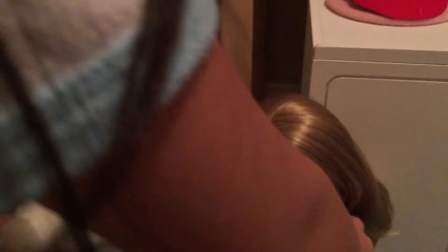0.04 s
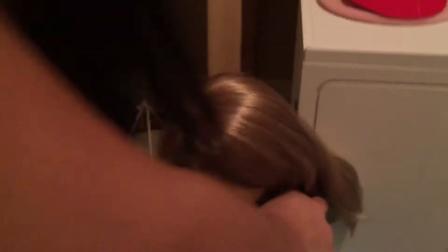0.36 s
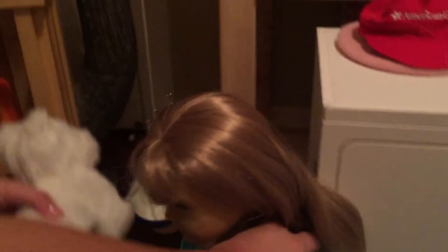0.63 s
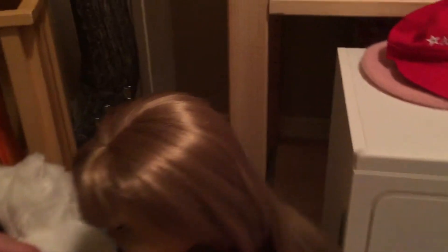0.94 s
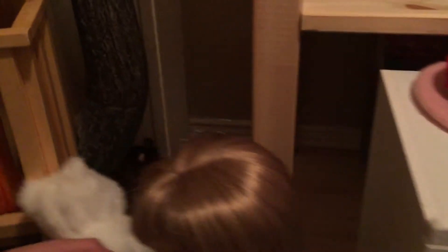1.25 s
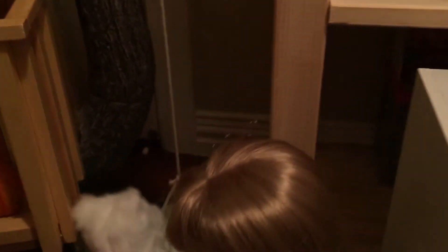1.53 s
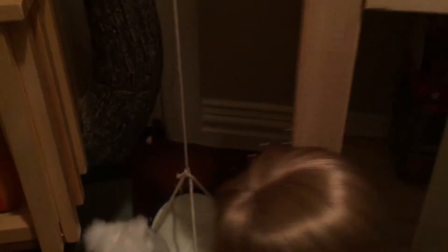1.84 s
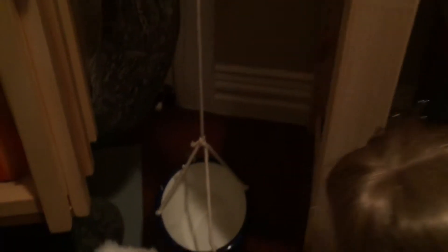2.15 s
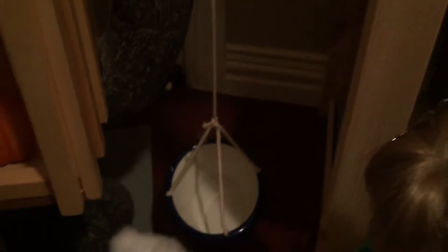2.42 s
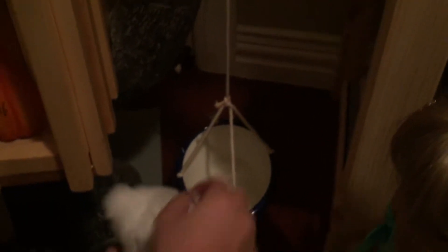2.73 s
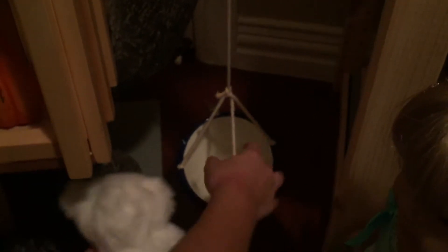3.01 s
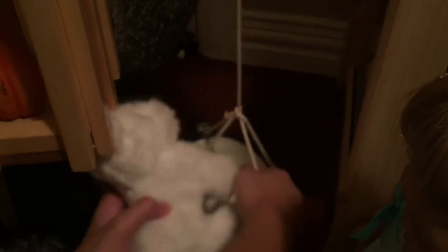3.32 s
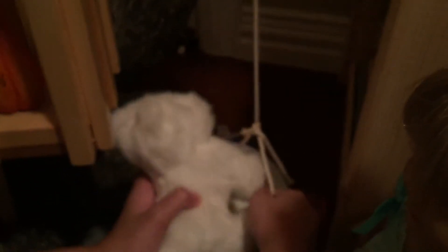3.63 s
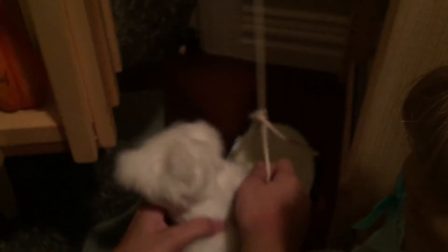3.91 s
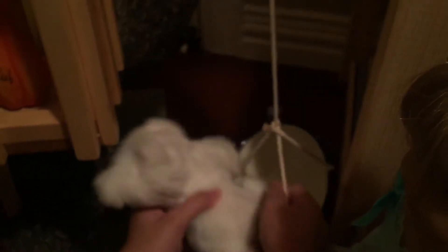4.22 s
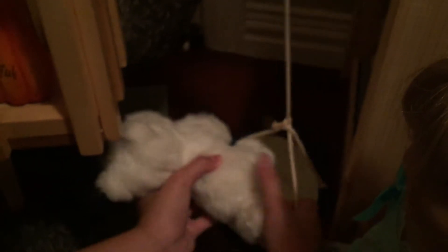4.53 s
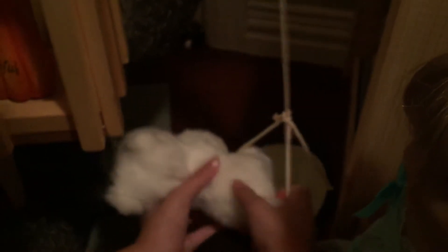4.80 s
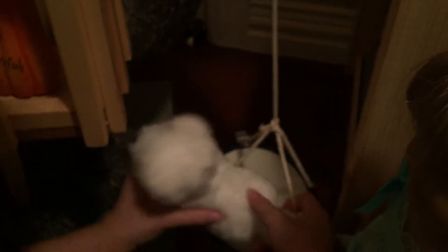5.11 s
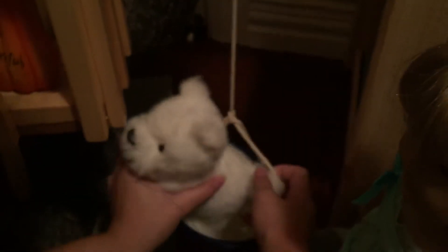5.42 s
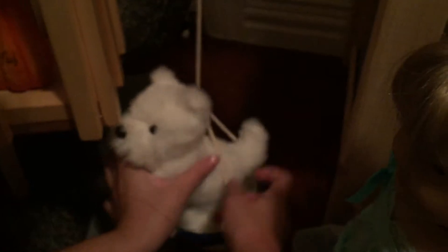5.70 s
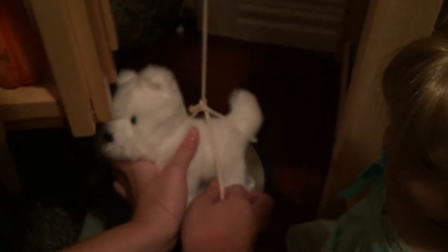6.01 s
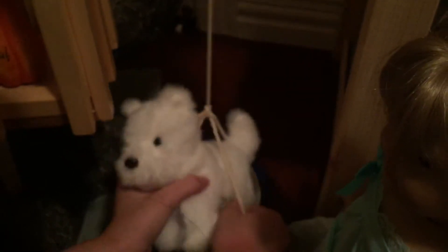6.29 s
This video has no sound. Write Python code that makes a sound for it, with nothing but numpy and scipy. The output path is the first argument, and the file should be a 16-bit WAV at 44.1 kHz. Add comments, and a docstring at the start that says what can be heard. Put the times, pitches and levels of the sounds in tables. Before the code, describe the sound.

In a small, quiet playroom, hard toys clack lightly and something bumps a hollow cabinet as a body shifts on the floor. A loud, sharp snap cuts in early, and a fainter one follows. After a short lull, a plush dog is pushed into a small plastic pail, with irregular ticks, light knocks, brief scrapes and soft fur rustle. A low hum and faint hiss lie underneath, all heard from nearby.

```python
"""Light clatter and dull bumps on a hollow cabinet, as someone shifts among toys in a small, quiet playroom.
Two sharp snaps cut in. Then a plush dog is pushed into a toy pail on a string: the thin wall ticks
and knocks, the fur rustles and scrapes. A low hum and a faint hiss lie under everything.
Cabinet and pail ring in decaying modes, clacks are noise bursts, snaps are impulses with a high ring,
and rubbing is noise roughened by stick and slip."""
import sys
import numpy as np
from scipy import signal
from scipy.fft import rfft, irfft, next_fast_len
from scipy.io import wavfile
from scipy.ndimage import uniform_filter1d, map_coordinates

SR = 44100
rng = np.random.default_rng(int(sys.argv[2]) if len(sys.argv) > 2 else 0)


def unload_wav(signal):
    """Save mono or channel-first audio to the path in sys.argv[1] as 16-bit WAV at rate SR, clipped to [-1, 1]."""
    wavfile.write(
        sys.argv[1],
        SR,
        np.round(np.clip(np.atleast_2d(signal).T, -1, 1) * 32767).astype(np.int16),
    )


N = 288855
SCENE_S = np.arange(N) / SR
BLOW_S = np.arange(SR // 2) / SR  # time within one blow

# Machine hum. Each row: frequency in Hz, level in dB.
HUM_PARTIALS = [(48, -55.5), (144, -74.5)]
# Body moving on the floor; plush rubbing. Each row: time in seconds, relative level in dB.
SHIFT_LEVELS = [(0.0, -53), (0.19, -59), (0.618, -43.5), (0.92, -50.5), (1.2, -46.5), (1.624, -69),
                (1.734, -64), (1.9, -77)]
RUB_LEVELS = [(0.0, -55), (0.18, -67.5), (0.4, -60.5), (0.51, -50.5), (0.93, -60.5), (1.88, -68.5),
              (2.37, -71.5), (2.64, -68), (3.03, -76), (4.05, -68), (4.27, -60.5), (4.67, -71.5),
              (5.16, -67), (5.33, -65), (5.67, -75), (5.93, -74.5), (6.37, -56.5), (6.55, -71)]
# Toys colliding. Each row: start in seconds, relative level in dB, centre in Hz, relative edge level in dB.
CLACKS = [(0.072, -37, 1100, -62), (0.08, -50, 816, -47), (0.109, -47, 940, -44), (0.227, -52.5, 2000, -48),
          (0.354, -37.5, 1060, -47), (0.793, -25.5, 1210, -35), (0.914, -36.5, 1130, -75),
          (1.008, -46.5, 848, -67), (1.075, -46, 1180, -56), (1.236, -26.5, 1250, -26.5),
          (1.448, -46.5, 795, -47), (1.471, -37.5, 724, -48.5), (1.499, -50, 900, -48.5),
          (1.701, -32.5, 760, -35.5), (1.71, -28.5, 1710, -36.5), (2.608, -66, 1800, -46.5)]
# Cabinet bumps. Each row: start in seconds, relative level in dB, centre in Hz.
BUMPS = [(0.124, -39.5, 155), (0.186, -36.5, 169), (0.356, -23.5, 488), (0.362, -28, 168),
         (0.71, -32.5, 143), (0.793, -18, 380), (0.912, -29.5, 208), (1.007, -30.5, 220),
         (1.054, -31.5, 220), (1.14, -34.5, 191), (1.241, -21.5, 304), (1.472, -33.5, 213),
         (4.136, -38, 186), (4.901, -43.5, 795)]
# Snaps. Each row: start in seconds, dry peak in dB, ring in Hz, bandwidth in Hz, crack over ring in dB.
SNAPS = [(0.5109, -6, 5600, 1790, 23.5), (1.5883, -25.5, 5430, 1170, -53)]
# Scrapes. Each row: midpoint in seconds, level in dB, width in seconds, centre in Hz.
SCRAPES = [(0.57, -65, 0.2, 3940), (0.745, -65.5, 0.12, 13000), (0.914, -57, 0.012, 1700),
           (0.945, -54, 0.011, 1710), (1.815, -63, 0.13, 1680), (2.56, -51, 0.0061, 1844),
           (2.612, -54.5, 0.011, 1900), (2.802, -76.5, .1, 2270), (2.849, -66, .016, 310),
           (2.962, -66, 0.022, 286), (3.58, -69.5, 0.098, 3460), (3.95, -64, 0.0085, 5230),
           (3.984, -56.5, 0.026, 4440), (4.156, -51, 0.045, 2270), (4.267, -63.5, 0.044, 2470),
           (4.289, -58.5, 0.18, 1140), (6.383, -66.5, 0.14, 4900)]
# Pail contacts. Each row: start in seconds, relative level in dB, centre in Hz, hardness in dB.
TAPS = [(3.368, -51, 720, -28), (3.627, -29, 1740, -21), (3.635, -31.5, 1700, -25),
        (3.782, -41, 1140, -22.5), (4.048, -51.5, 686, -9), (4.11, -26, 1300, -22),
        (4.121, -21.5, 2500, -27), (4.29, -39.5, 1030, -34), (4.402, -34, 690, -20.5),
        (4.582, -34, 1210, -30), (4.652, -43.5, 473, -41), (4.669, -45.5, 511, -23),
        (4.813, -44, 1300, -33), (4.903, -31, 885, -49), (5.15, -37, 2070, -20), (5.174, -38, 720, -28),
        (5.275, -42.5, 2280, -3.5), (5.314, -21, 1420, -18.5), (5.329, -29, 1420, -17),
        (5.451, -36.5, 2620, -39), (5.627, -35.5, 860, -19.5), (5.9, -35.5, 1380, -26.5),
        (6.032, -40.5, 1330, -11.5), (6.072, -42, 850, -22), (6.149, -35, 1500, -36),
        (6.21, -37.5, 1230, -29), (6.264, -36, 1340, -21), (6.287, -22, 2570, -25),
        (6.307, -24, 1370, -18.5), (6.424, -40.5, 1210, -10.5), (6.435, -25, 1300, -21),
        (6.458, -27, 1400, -22), (6.476, -35.5, 1340, -20)]
# Panel and wall modes. Each row: frequency in Hz, gain in dB, T60 in seconds before stretching.
CABINET_MODES = [(154.6, -4.5, 0.13), (187, -6.5, 0.25), (237.5, -3.5, 0.085), (267, -7.5, 0.16),
                 (306.6, -8, 0.13), (340.8, -6.5, 0.16), (399, -3.5, 0.17), (458, -9, 0.163),
                 (580, -12, 0.12), (795, -25, 0.15), (1210, -21, 0.055)]
PAIL_MODES = [(330.5, -17.5, 0.076), (525, -12, 0.049), (686, -16, 0.058), (845, -4.5, 0.026),
              (1250, -3.5, 0.02), (1306, -3, 0.025), (1360, -30.5, 0.16), (1620, -20.5, 0.16),
              (1827, -6, 0.03), (2382, -32, 0.1), (2490, -11.5, 0.009), (3050, -11, 0.045),
              (3434, 0.5, 0.03), (3900, -7, 0.062)]
# Source spectra. Each row: frequency in Hz, gain in dB.
HISS_SPECTRUM = [(22, -15), (33, -15), (48, 8), (70, -1), (100, -9), (160, -9), (250, -16), (500, -25.5),
                 (1200, -29.5), (3000, -28), (6500, -32.5), (10500, -35.5), (15000, -37.5)]
RUMBLE_SPECTRUM = [(47, -74), (80, 14.5), (220, -2), (308, 3), (413, -8), (485, -37), (532, -26),
                   (900, -52), (1170, -91), (1980, -120)]
RUB_SPECTRUM = [(200, -20), (500, 1.5), (800, -3), (1050, -1.5), (1330, -5), (1700, -3.5), (2500, -9.5),
                (4000, -15.5), (6500, -19.5), (9000, -26.5)]
CLACK_SPECTRUM = [(200, -18), (500, 3), (900, -3.5), (1250, -4), (2000, -4), (3200, -2), (5000, -18),
                  (9000, 5), (15000, 5.5)]
EDGE_SPECTRUM = [(1500, -25), (3000, -4), (4200, 0), (6300, -2), (7600, -12), (9000, -11), (10500, -19),
                 (15000, -21)]
CRACK_SPECTRUM = [(300, -12), (1000, -6), (1900, 0), (4000, 0), (6000, -1), (7600, -11), (8800, -9),
                  (10000, -17), (15000, -17)]
SCUFF_SPECTRUM = [(200, -59.5), (480, 8.5), (1300, -19), (2000, 7.5), (2800, 16), (4500, -26.5), (6300, 2),
                  (8000, -26), (15000, -7)]
# Playroom decay. Each row: frequency in Hz, T60 in seconds.
ROOM_T60 = [(150, 0.55), (500, 0.42), (2000, 0.26), (6000, 0.26), (14000, 0.16)]


def amp(db):
    """Decibels to gain."""
    return 10 ** (np.asarray(db) / 20)


def decay(t60_s):
    """Envelope falling 60 dB in t60_s."""
    return amp(-60 * BLOW_S / t60_s)


def levelled(x, db, size):
    """Scale x so its first size samples have an rms of db."""
    return amp(db) * x / np.sqrt(np.mean(x[:size] ** 2) + 1e-20)


def at_hz(points, hz):
    """Interpolate on a log frequency axis."""
    knots_hz, values = np.transpose(points)
    return np.interp(np.log(hz + 1), np.log(knots_hz + 1), values)


def at_time(points, time_s):
    """Interpolate on a time axis."""
    return np.interp(time_s, *np.transpose(points))


def wobble(rate_hz):
    """Smooth random curve with knots at rate_hz."""
    knots = rng.standard_normal(int(N * rate_hz / SR) + 4)
    return map_coordinates(knots, [SCENE_S * rate_hz])


def coloured(x, spectrum):
    """Minimum-phase filter with the given spectrum."""
    size = 2 * next_fast_len(len(x) // 2 + 4096)
    cepstrum = irfft(np.log(amp(at_hz(spectrum, np.fft.rfftfreq(size, 1 / SR)))))
    cepstrum[1:size // 2] *= 2
    cepstrum[size // 2 + 1:] = 0
    return irfft(rfft(x, size) * np.exp(rfft(cepstrum)))[:len(x)]


def noise(spectrum, size=len(BLOW_S)):
    """Coloured noise of rms 1."""
    return levelled(coloured(rng.standard_normal(size), spectrum), 0, size)


def softened(x, corner_hz):
    """Low-pass: a soft contact passes little above its corner."""
    return signal.lfilter(*signal.butter(2, np.clip(corner_hz, 40, 0.45 * SR), fs=SR), x)


def contact(x, hz, focus_db):
    """The struck spot favours one band; little rings far above it."""
    band = signal.lfilter(*signal.iirpeak(np.clip(hz, 60, 0.3 * SR), Q=3.5, fs=SR), x)
    return softened(x + amp(focus_db) * band, corner_hz=900 + 0.84 * hz)


def ringing(modes, gains, stretch):
    """Decaying sines of random phase; stretch scales their T60."""
    hz, db, t60_s = np.transpose(modes)[:, :, None]
    phase = rng.uniform(0, 2 * np.pi, hz.shape)
    return gains @ (amp(db) * decay(t60_s * stretch) * np.sin(2 * np.pi * hz * BLOW_S + phase))


def near_walls(x, echo_db, count=4):
    """Nearby shelves and floor return weak copies that comb the sound."""
    out = x.copy()
    for delay_s, sign in zip(rng.uniform(0.001903, 0.012, count), rng.choice([-1, 1], count)):
        lag = int(delay_s * SR)
        out[lag:] += sign * amp(echo_db) * x[:-lag]
    return out


def in_room(x, wet_db, smooth_bins=1):
    """A blow plus its diffuse tail, in which treble dies first."""
    hz, time_s, frames = signal.stft(rng.standard_normal(len(BLOW_S)), SR, nperseg=256)
    frames *= amp(-60 * time_s / at_hz(ROOM_T60, hz)[:, None])
    tail = signal.istft(frames, SR, nperseg=256)[1][:len(BLOW_S)]
    tail *= 1 - np.exp(-(BLOW_S / 0.0055) ** 2)  # first reflections build up
    tail *= amp(wet_db) / np.linalg.norm(tail)
    if smooth_bins == 1:
        return x + signal.fftconvolve(x, tail)[:len(x)]
    # Summed over all directions, spectral notches fill in.
    power = np.abs(uniform_filter1d(np.abs(rfft(x)) ** 2, smooth_bins))
    diffuse_blow = np.fft.fftshift(irfft(np.sqrt(power)))
    return x + signal.fftconvolve(tail, diffuse_blow, "same")


def add(track, start_s, x):
    """Mix x into the track at start_s."""
    start = round(start_s * SR)
    track[start:start + len(x)] += x[:N - start]


def background():
    """A slightly unsteady machine hum in the house, and steady hiss."""
    drift_rad = 0.062 * wobble(8.8)
    hum = sum(np.sqrt(2) * amp(db) * np.sin(2 * np.pi * hz * SCENE_S + drift_rad)
              for hz, db in HUM_PARTIALS)
    waver_db = 0.8 * wobble(11)
    return hum * amp(waver_db) + amp(-61.5) * noise(HISS_SPECTRUM, N)


def rustle():
    """Cloth and plush rub in small, uneven slips."""
    slips_db = 2.2 * wobble(30) + 2.2 * wobble(220)
    return amp(at_time(RUB_LEVELS, SCENE_S) - 4.5 + slips_db) * noise(RUB_SPECTRUM, N)


def floor_rumble():
    """A body shifts on the floor: low, uneven noise."""
    moving = SCENE_S < SHIFT_LEVELS[-1][0]
    level_db = at_time(SHIFT_LEVELS, SCENE_S) - 6 + 4.1 * wobble(23.8)
    return moving * amp(level_db) * noise(RUMBLE_SPECTRUM, N)


def edge(db, t60_s):
    """The short, bright tick of two hard surfaces meeting."""
    return levelled(noise(EDGE_SPECTRUM) * decay(t60_s), db, size=256)


def clatter(t60_s=0.058):
    """Hard toys have crowded, short-lived modes: each clack is a noise burst."""
    out = np.zeros(N)
    attack = 1 - np.exp(-(BLOW_S / 0.00064) ** 2)
    for start_s, db, hz, edge_db in CLACKS:
        burst = noise(CLACK_SPECTRUM) * decay(t60_s)
        body = levelled(contact(burst, hz, focus_db=11.5), db - 6, size=256)
        clack = body + edge(edge_db - 12, 0.36 * t60_s)
        add(out, start_s, in_room(clack * attack, wet_db=-5, smooth_bins=200))
    return out


def cabinet():
    """Padded bumps set the panel booming; the struck place weights the modes."""
    out = np.zeros(N)
    mode_hz = np.transpose(CABINET_MODES)[0]
    attack = 1 - np.exp(-BLOW_S / 0.00136)
    for start_s, db, hz in BUMPS:
        place = 0.076 + 0.04 * rng.uniform(-1.3, 1)  # fraction of the panel's length
        shape = 1 + 0.76 * np.cos(np.pi * place * np.arange(len(mode_hz)))
        focus = 1 + 1.94 * np.exp(-(np.log(mode_hz / hz) / 0.23) ** 2)
        boom = ringing(CABINET_MODES, shape * focus, stretch=0.52) * attack
        corner_hz = 1300 * amp(db / 2 + 6)  # harder bump: shorter contact, brighter sound
        bump = levelled(softened(boom, corner_hz), db - 8.5, size=700)
        add(out, start_s, in_room(bump, wet_db=-7))
    return out


def snaps():
    """A sudden release: a broad crack and a few cycles of a high resonance."""
    out = np.zeros(N)
    attack = 1 - np.exp(-BLOW_S / 0.00015)
    crack = coloured(signal.unit_impulse(len(BLOW_S)), CRACK_SPECTRUM)
    for start_s, db, hz, width_hz, crack_db in SNAPS:
        ring = np.sin(2 * np.pi * hz * BLOW_S) * np.exp(-np.pi * width_hz * BLOW_S) * attack
        snap = ring / np.abs(ring).max() + amp(crack_db) * crack / np.abs(crack).max()
        scatter = 0.069 * rng.standard_normal(len(BLOW_S)) * decay(0.031)  # off nearby objects
        snap += signal.fftconvolve(snap, scatter)[:len(BLOW_S)]
        snap *= amp(db) / np.abs(snap).max()
        add(out, start_s, in_room(snap, wet_db=-12.5, smooth_bins=300))
    return out


def scrapes():
    """Hair, string and plastic stick and slip in brief, faintly pitched scrapes."""
    out = np.zeros(N)
    for middle_s, db, width_s, hz in SCRAPES:
        band = [(hz / 5, -30), (hz / 1.25, -9), (hz, 0), (hz * 1.25, -9), (hz * 2, -22), (hz * 5, -50)]
        slips_db = 3.5 * wobble(300)
        swell = np.exp(-2 * ((SCENE_S - middle_s) / width_s) ** 2)
        out += amp(db + slips_db) * swell * noise(band, N)
    return out


def stray_ticks(held_from_s=2.8, rate_hz=8.2, hardness_db=-32):
    """Rows like TAPS: the held pail ticks at random, padded by fur, louder as the plush rubs harder."""
    gap, strength, octaves = rng.uniform(-1, 1, (100, 3)).T
    starts_s = held_from_s + np.cumsum(1 + gap) / rate_hz
    levels_db = at_time(RUB_LEVELS, starts_s) + 16 + 7 * strength
    centres_hz = 920 * 2 ** (0.8 * octaves)
    return [(start_s, db, hz, hardness_db)
            for start_s, db, hz in zip(starts_s, levels_db, centres_hz) if start_s < N / SR]


def pail_tap(db, hz, hardness_db):
    """Handle or toy taps the thin, hand-damped wall; harder contacts are brighter."""
    base_t60_s = 0.03 * (1300 / hz) ** 0.9  # higher spots die sooner
    rise_s = 0.0014 * np.exp(0.0029 * (db + 25))  # plastic yields for a moment
    detune = 1 + 0.029 * rng.normal()  # each grip retunes the wall
    gains = amp(rng.normal(0, 0.74, len(PAIL_MODES)))
    ring = ringing(np.array(PAIL_MODES) * [detune, 1, 1], gains, stretch=base_t60_s / 0.033)
    scuff = 0.85 * noise(SCUFF_SPECTRUM) * decay(1.1 * base_t60_s)
    padded = softened(ring + scuff, corner_hz=22300 * 2 ** (hardness_db / 11))
    body = levelled(contact(padded, hz, focus_db=2), db - 9, size=256)
    tick = softened(edge(db + hardness_db + 0.5, 0.64 * base_t60_s), corner_hz=12900)
    attack = 1 - np.exp(-(BLOW_S / rise_s) ** 2)
    return (body + tick) * attack


def pail():
    """Clear taps as the toy is pushed in, with faint ticks between."""
    out = np.zeros(N)
    for start_s, db, hz, hardness_db in list(TAPS) + stray_ticks():
        tap = near_walls(pail_tap(db, hz, hardness_db), echo_db=-13.5)
        add(out, start_s, in_room(tap, wet_db=-10, smooth_bins=60))
    return out


def scene():
    """All sources, summed to mono."""
    return (background() + rustle() + floor_rumble() + cabinet() + clatter()
            + snaps() + scrapes() + pail())[None]


def record(dry):
    """Brick-wall low-pass."""
    cutoff_hz = 15950
    size = next_fast_len(N + SR // 2)
    passband = np.fft.rfftfreq(size, 1 / SR) < cutoff_hz
    return irfft(rfft(dry, size) * passband, size)[..., :N]


dry = scene()
out = record(dry)
unload_wav(out)
```